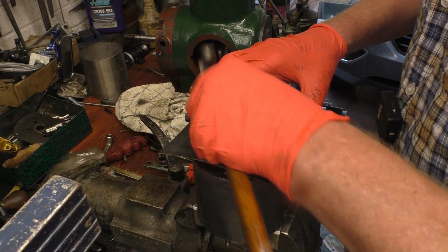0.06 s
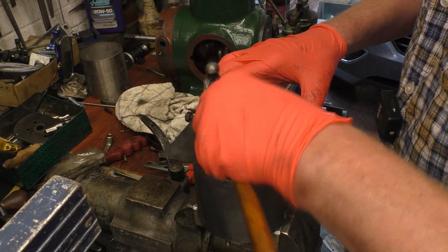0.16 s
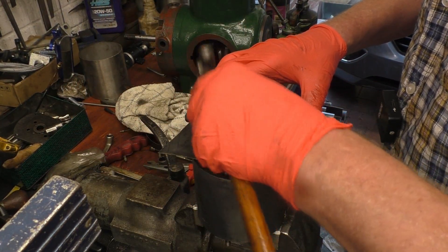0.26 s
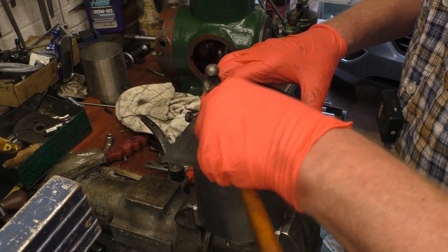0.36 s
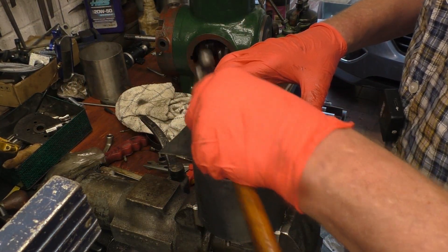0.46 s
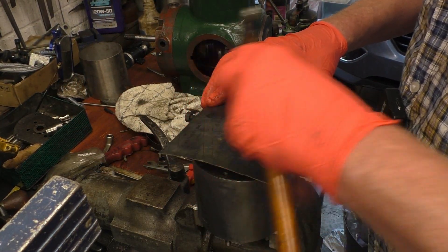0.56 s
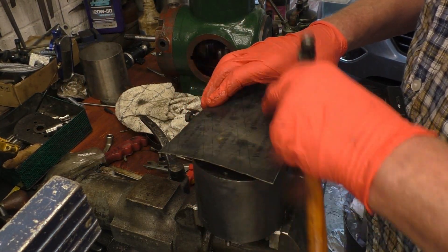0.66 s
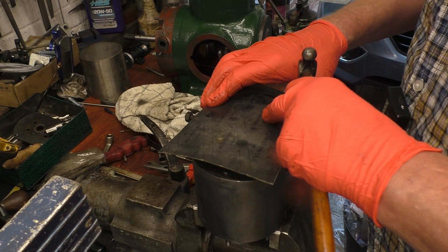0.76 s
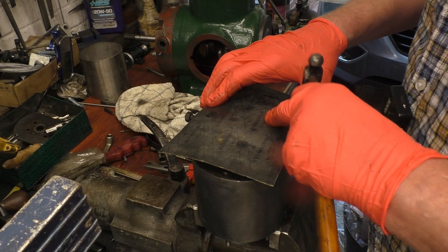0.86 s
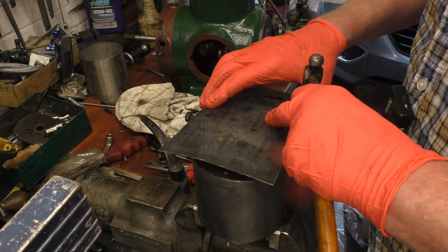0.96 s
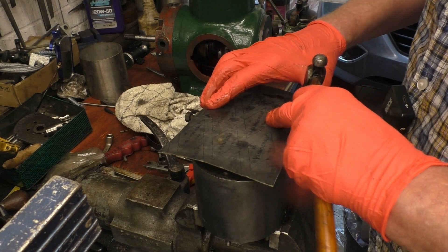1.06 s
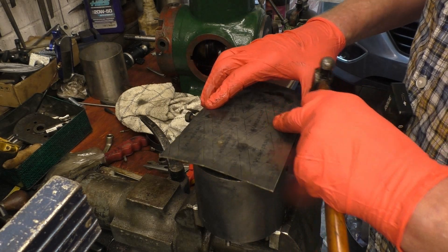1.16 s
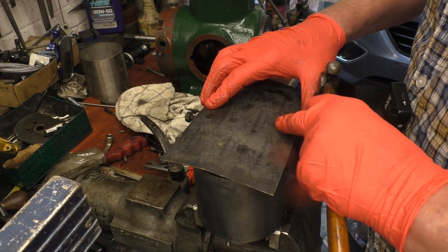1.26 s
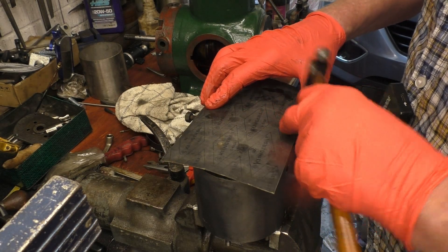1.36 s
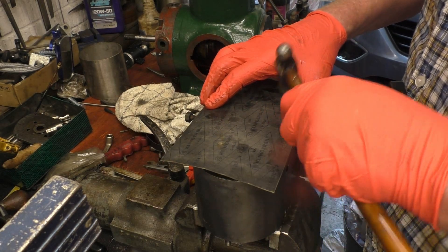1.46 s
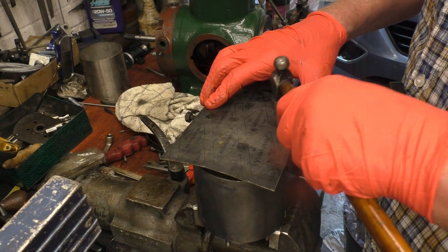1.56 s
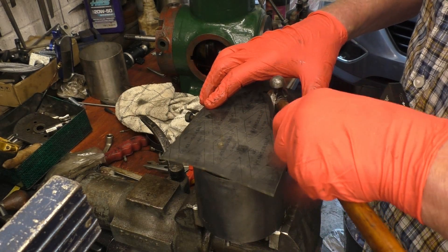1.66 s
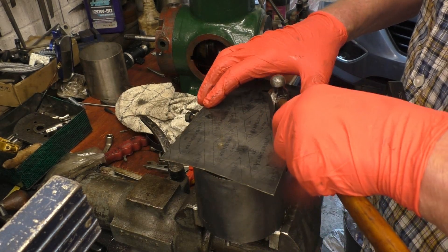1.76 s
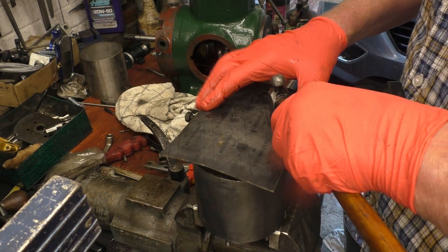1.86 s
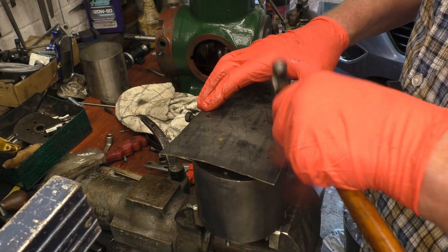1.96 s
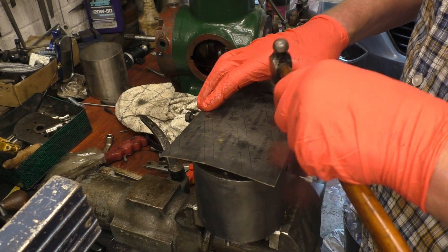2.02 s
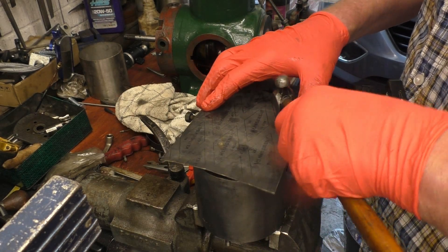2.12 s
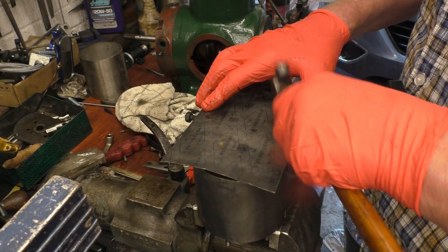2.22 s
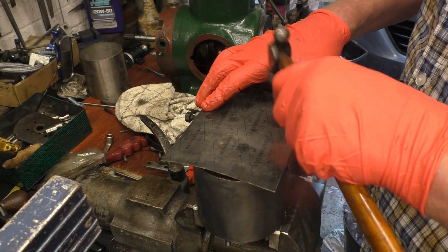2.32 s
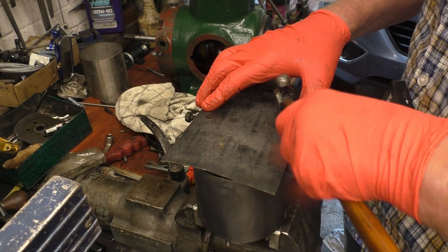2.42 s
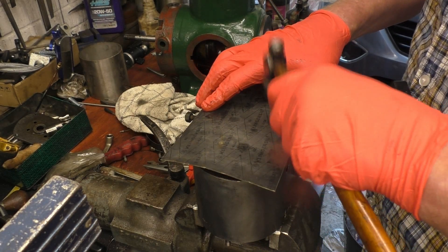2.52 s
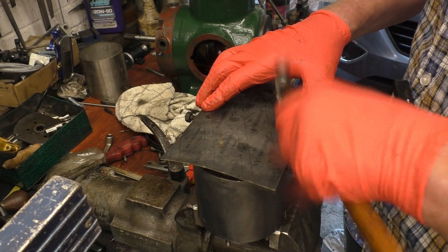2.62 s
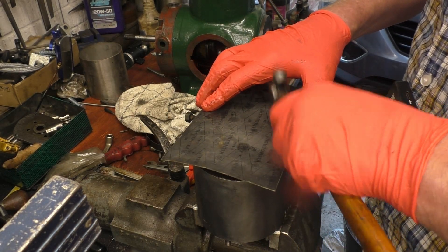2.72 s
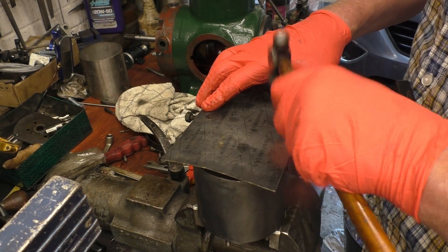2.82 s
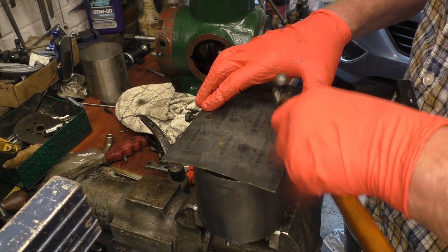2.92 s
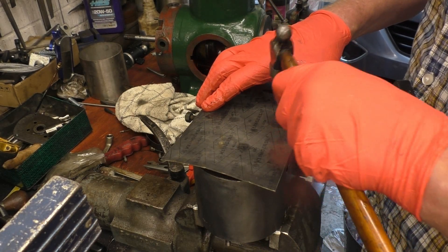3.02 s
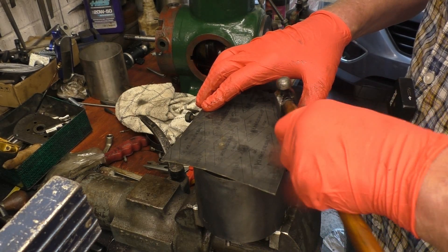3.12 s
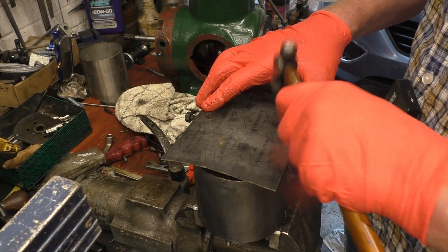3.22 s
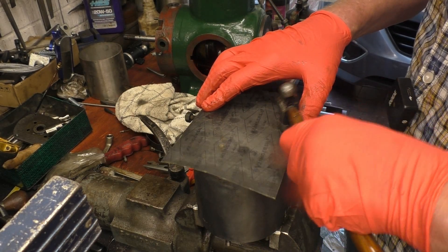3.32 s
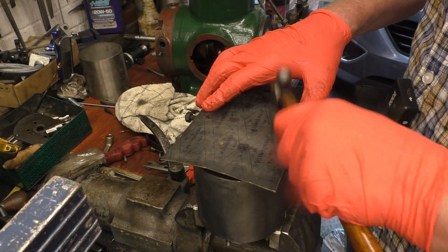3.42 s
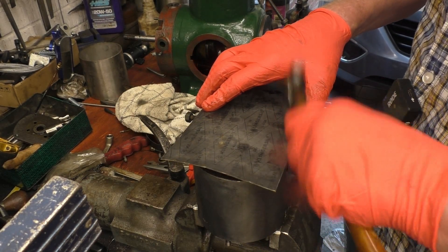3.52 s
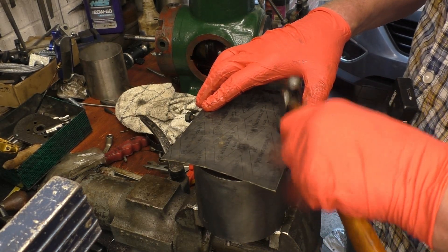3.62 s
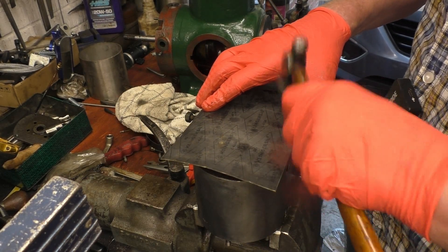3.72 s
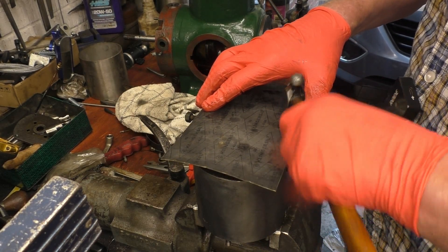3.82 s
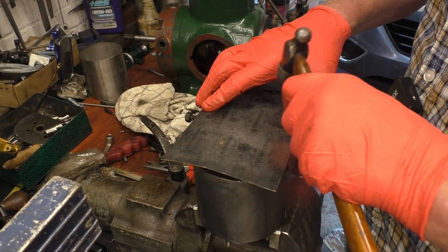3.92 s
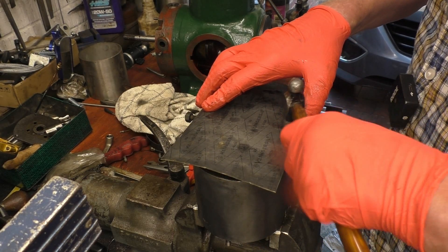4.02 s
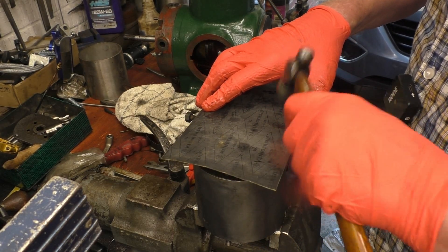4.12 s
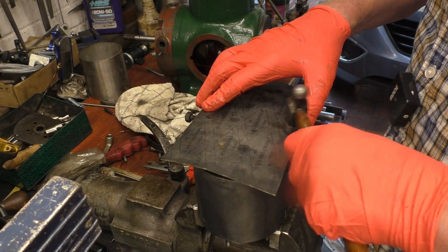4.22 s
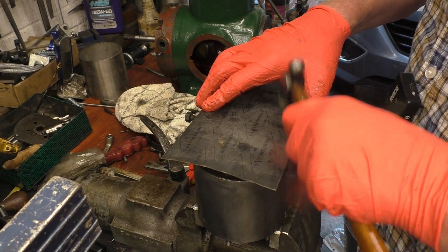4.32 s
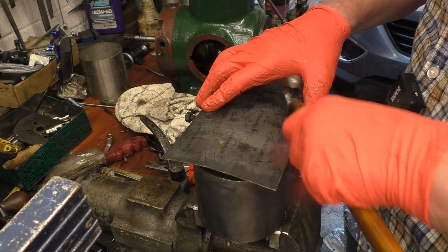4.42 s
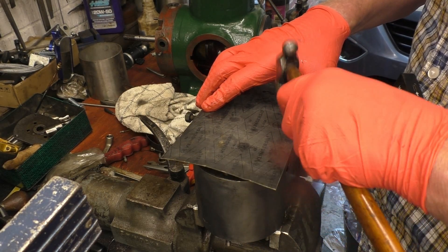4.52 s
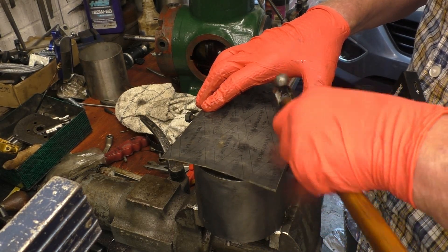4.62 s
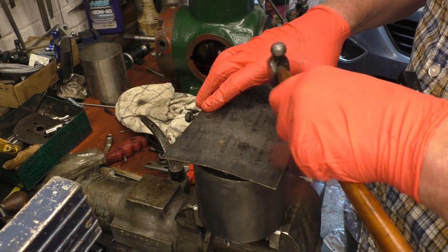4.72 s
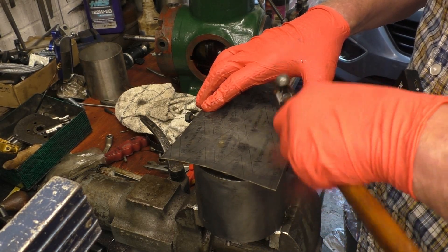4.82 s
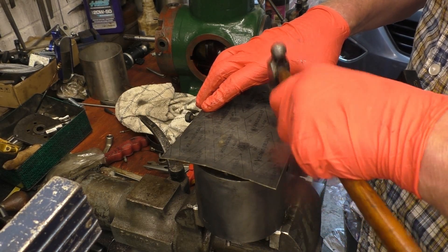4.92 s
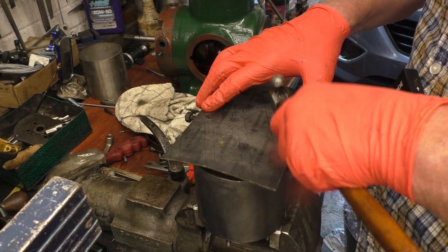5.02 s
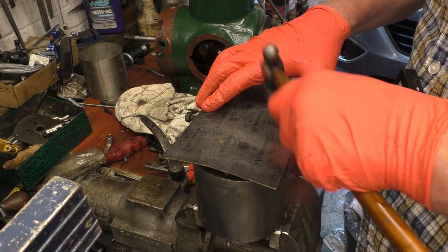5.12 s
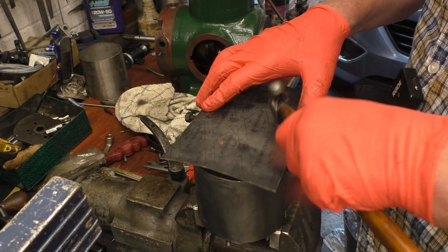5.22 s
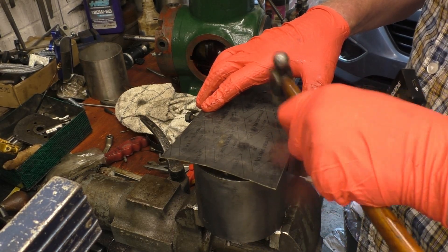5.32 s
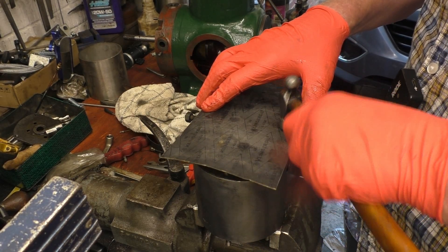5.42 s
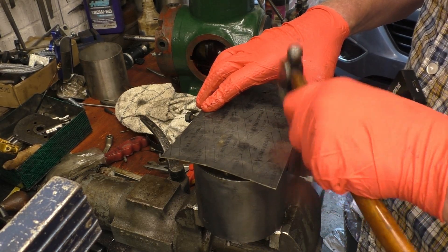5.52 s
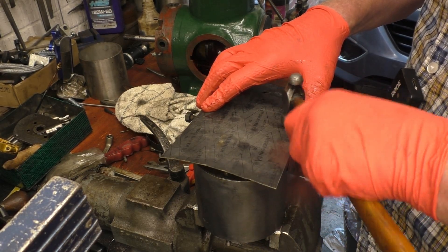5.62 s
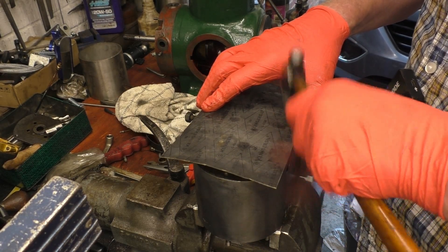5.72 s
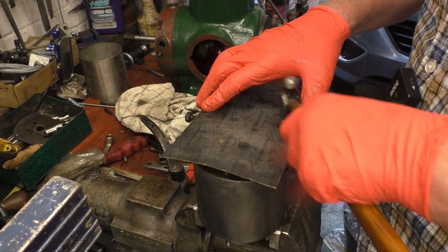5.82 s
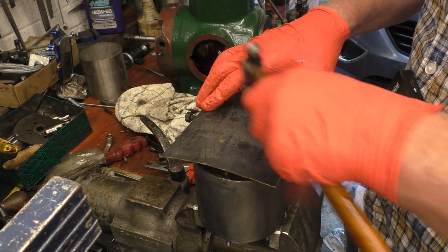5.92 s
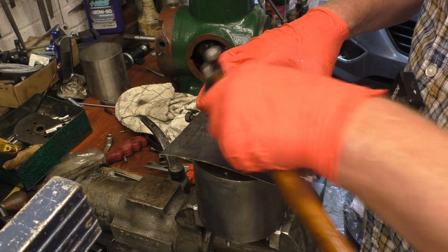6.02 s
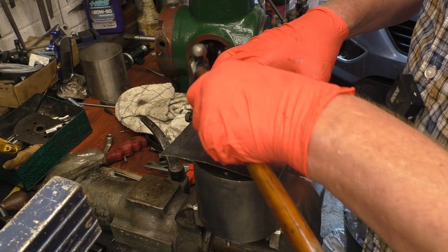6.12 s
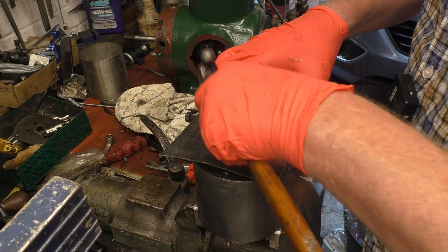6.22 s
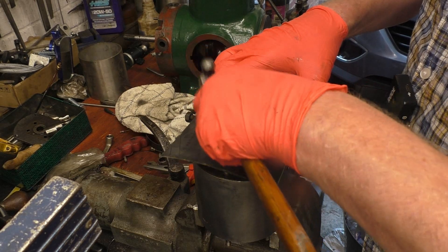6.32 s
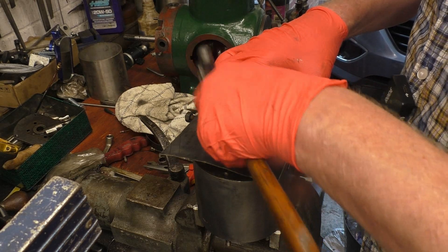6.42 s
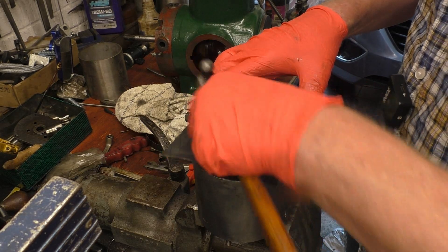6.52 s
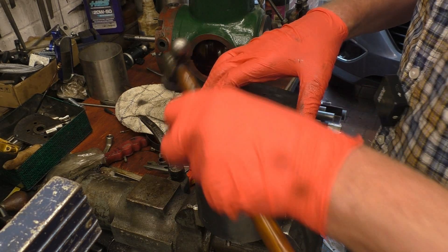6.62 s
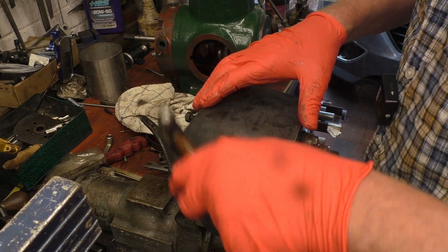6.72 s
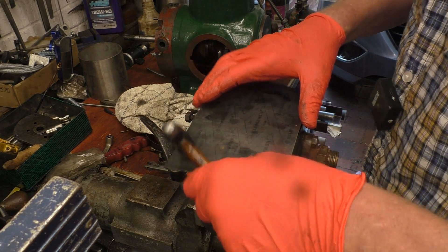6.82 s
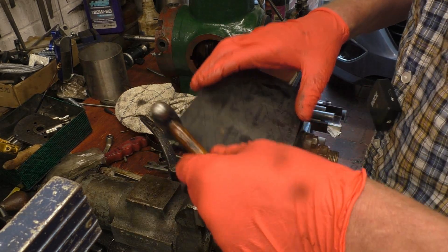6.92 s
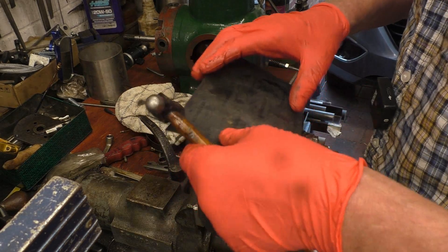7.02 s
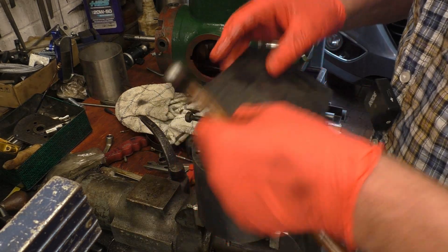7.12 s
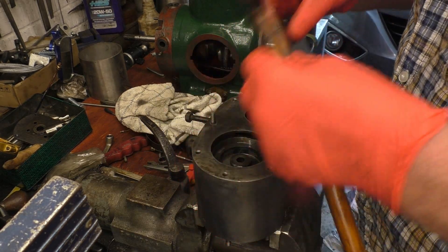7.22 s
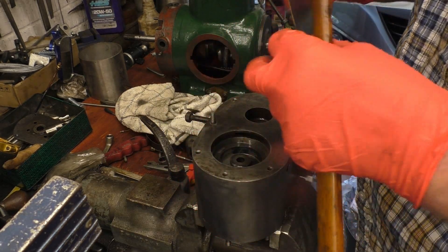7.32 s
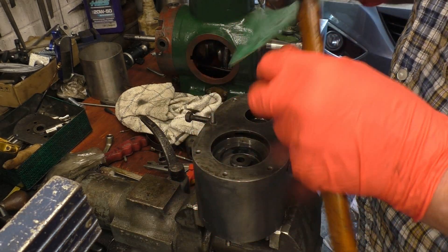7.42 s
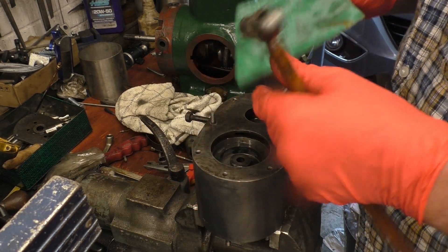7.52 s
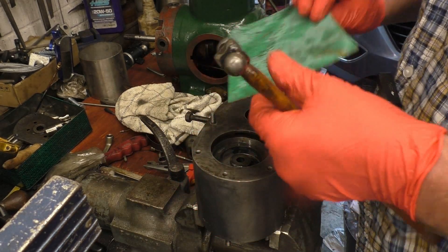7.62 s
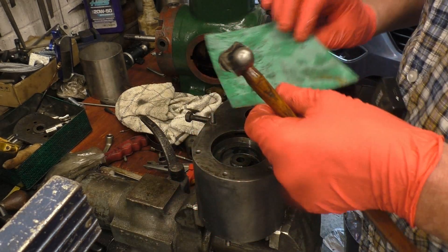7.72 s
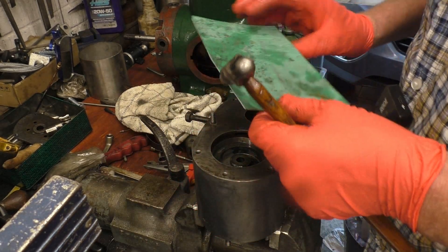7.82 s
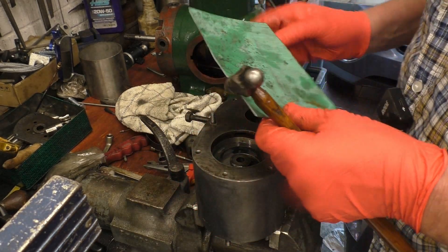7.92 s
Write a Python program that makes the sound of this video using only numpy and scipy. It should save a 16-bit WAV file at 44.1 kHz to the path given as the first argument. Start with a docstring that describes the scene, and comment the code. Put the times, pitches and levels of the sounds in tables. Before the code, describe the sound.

A close microphone in a small workshop, with faint low air noise and machine hum behind. Three hard hammer blows come at 0.05, 0.25 and 0.45 s: short, dry knocks around a mid pitch, with a bright clack, a brief metallic ring and a short room echo, slightly crushed by overload. From 0.5 to 1.6 s the paper slides with soft hisses, and there is a light bump near 0.8. A barely audible tap at 1.7 and a soft one at 2.2 lead into a regular run, four to five blows a second, until 5.85 s, varying in force and papery snap, some slightly softer near 5. After a gap come a weak tap at 6.35 and a firmer one at 6.55. Light bumps follow at 6.8 to 6.9, then until about 8 s gloves rub dully, the stiff sheet rustles and ticks, and the part is nudged with low knocks, strongest near 7.47.

```python
"""A small hammer taps out a gasket, close to the microphone in a small workshop: thick paper over a metal part.
Each blow adds decaying noise (thud, clack, snap) to ringing tones of part and room; strong peaks overload the input.
Filtered frictional noise gives the hiss of the sliding sheet and the dull rub of the gloves that lift it off.
Short filtered bursts make the bumps, nudges and paper ticks; steady noise and four drifting tones lie behind."""
import sys
import numpy as np
from scipy import signal
from scipy.fft import rfft, irfft, next_fast_len
from scipy.io import wavfile

SR = 44100
rng = np.random.default_rng(int(sys.argv[2]) if len(sys.argv) > 2 else 0)


def wav_out(sig):
    """Save sig, one row per channel (or a flat mono array), as 16-bit PCM at SR to the path in sys.argv[1]."""
    wavfile.write(sys.argv[1], SR, np.round(np.clip(np.atleast_2d(sig).T, -1, 1) * 32767).astype(np.int16))


N = 350947  # length in samples
T = np.arange(SR // 2) / SR  # seconds within each short sound


def amp(db):
    """Decibels to gain."""
    return 10 ** (np.asarray(db) / 20)


def unit(x):
    """Scale to rms 1."""
    return x / np.sqrt(np.mean(x ** 2) + 1e-20)


def along(points, hz):
    """Read (Hz, value) points on a logarithmic frequency axis."""
    point_hz, values = np.transpose(points)
    return np.interp(np.log(hz + 1), np.log(point_hz + 1), values)


def add(track, start_s, sound):
    """Mix a sound into the track from start_s on."""
    place = track[round(start_s * SR):][:len(sound)]
    place += sound[:len(place)]


def coloured(x, spectrum):
    """Filter x with a causal, minimum-phase response of the given (Hz, dB) spectrum, at rms 1."""
    m = 2 * next_fast_len(len(x))
    log_gain = np.log(amp(along(spectrum, np.fft.rfftfreq(m, 1 / SR))))
    cepstrum = irfft(log_gain)
    # folding the cepstrum onto positive time makes the filter causal
    cepstrum[1:m // 2] *= 2
    cepstrum[m // 2 + 1:] = 0
    response = np.exp(rfft(cepstrum))
    return unit(irfft(rfft(x, m) * response)[:len(x)])


def burst(t60):
    """White noise that dies away by 60 dB in t60 seconds."""
    return rng.standard_normal(len(T)) * amp(-60 * T / t60)


# The small workshop around the microphone. Each row: frequency in Hz, time to die by 60 dB in seconds.
ROOM_DECAY = [(40, 0.7), (100, .35), (170, 0.31), (300, 0.23), (900, 0.22), (2500, 0.26), (5000, 0.24),
              (14000, 0.13)]


def room_tail():
    """A diffuse echo in which each frequency dies at its own speed, at rms 1."""
    hz, t, cells = signal.stft(rng.standard_normal(len(T)), SR, nperseg=256)
    decay = amp(-60 * t / along(ROOM_DECAY, hz)[:, None])
    tail = signal.istft(cells * decay, SR, nperseg=256)[1][:len(T)]
    tail = tail * (1 - np.exp(-(T / 0.0021) ** 2))  # the walls take a few ms to answer
    return unit(tail)


def with_echo(t60):
    """A noise burst and its room echo, each at rms 1."""
    return np.array([unit(burst(t60)), unit(room_tail())])


def heard(pair, spectrum, wet_db):
    """A burst and its echo in the colour of what was struck, at rms 1."""
    direct, echo = pair
    return coloured(direct + amp(wet_db) * echo, spectrum)


def wander(t, rate_hz):
    """Random values, rate_hz of them a second, joined by straight lines."""
    count = int(t[-1] * rate_hz) + 2
    return np.interp(t * rate_hz, np.arange(count), rng.standard_normal(count))


def friction(size, grain=0.37, sway=0.16, crackles_per_s=30, crackle_size=10):
    """Stick and slip: noise whose strength varies finely and in slower lumps, with sparse crackles."""
    t = np.arange(size) / SR
    # fibres that catch and let go
    caught = rng.random(size) < crackles_per_s / SR
    crackles = crackle_size * caught * rng.laplace(size=size)
    strength = np.exp(grain * wander(t, 500) + sway * wander(t, 40))
    return (rng.standard_normal(size) + crackles) * strength


# The air of the workshop, steady behind everything. Each row: frequency in Hz, spectrum level in dB.
AIR_SPECTRUM = [(12, -42), (20, 0.5), (55, -17.5), (228, -6.5), (328, -10), (434, -9), (678, -14.5),
                (738, -6), (897, -14.5), (1060, -12.5), (1440, -16.5), (1660, -20), (3950, -25.5),
                (6010, -26.5), (16000, -37.5)]
# The faint machine hum. Each row: frequency in Hz, rms level in dB before the common hum lift.
HUM_TONES = [(96.9, -74), (393.0, -72), (527.6, -77), (748.3, -76)]


def workshop(air_db=-58, hum_lift_db=1.5):
    """Steady coloured air noise and machine tones whose phases drift at random."""
    t = np.arange(N) / SR
    hum = np.zeros(N)
    for hz, db in HUM_TONES:
        drift = np.cumsum(rng.standard_normal(N)) * 0.018  # radians
        hum += amp(db) * np.sqrt(2) * np.sin(2 * np.pi * hz * t + drift)
    air = coloured(rng.standard_normal(N), AIR_SPECTRUM)
    return amp(air_db) * air + amp(hum_lift_db) * hum


# Gloves take hold of the sheet and lift it off. Each row: time in seconds, level in dB before the rub lift.
GLOVE_GRIP = [(6.68, -58.5), (7.142, -51.5), (7.4, -48), (7.532, -50.5), (7.67, -64), (7.95, -54.5)]
# The dull rub of the gloves, close by. Each row: frequency in Hz, spectrum level in dB.
GLOVE_SPECTRUM = [(18, -24), (30, -10), (76, -5), (295, -7.5), (339, -4.5), (638, -6.5), (802, -7.5),
                  (2000, -11.5), (2600, -12.5), (4400, -120)]


def gloves(rub_lift_db=1, fade_s=0.027):
    """The gloves rub on the sheet: dull frictional noise that follows the strength of the grip."""
    t = np.arange(N) / SR
    grip_s, grip_db = np.transpose(GLOVE_GRIP)
    fade_in = np.clip(1 + (t - grip_s[0]) / fade_s, 0, 1)
    level = amp(np.interp(t, grip_s, grip_db) + rub_lift_db)
    return fade_in * level * coloured(friction(size=N), GLOVE_SPECTRUM)


# The sheet slides on metal and glove.
# Each row: start in seconds, length in seconds, level in dB before the swell, centre of the hiss in Hz.
SHEET_SLIDES = [(0.499, 0.27, -56.5, 5200), (0.759, 0.049, -48, 4900), (0.815, 0.073, -56.5, 7000),
                (0.85, 0.32, -63.5, 5500), (1.159, 0.17, -57, 8000), (1.389, 0.066, -61.5, 2950),
                (1.455, 0.14, -51, 4340), (1.751, 0.35, -63.5, 4540), (6.329, 0.09, -54, 6500),
                (6.55, 0.3, -57.5, 5820), (6.8, 0.4, -55, 4500), (7.097, 0.12, -49.5, 7050),
                (7.161, 0.18, -51.5, 6500), (7.26, 0.37, -48.5, 2270), (7.573, 0.17, -57, 3240),
                (7.785, 0.23, -50.5, 5260)]
# Paper rustle before the peak of each slide. Each row: frequency in Hz, spectrum level in dB.
RUSTLE_SPECTRUM = [(700, -32), (1300, 0), (2000, -3.5), (2800, -4), (4300, -5.5), (6400, -4.5),
                   (7600, -5.5), (9000, -8), (12000, -16), (16000, -27)]


def sheet(peak_db=9, peak_octaves=1, swell_exponent=0.96):
    """Each slide of the paper is a finely grained hiss that swells and fades in an arch."""
    out = np.zeros(N)
    hz = np.geomspace(300, 16000, 60)
    for start_s, length_s, db, centre_hz in SHEET_SLIDES:
        peak = peak_db * np.exp(-(np.log2(hz / centre_hz) / peak_octaves) ** 2)
        colour = along(RUSTLE_SPECTRUM, hz) + peak
        swell = np.abs(np.sin(np.pi * np.minimum(T / length_s, 1))) ** swell_exponent
        hiss = coloured(friction(size=len(T)), np.column_stack([hz, colour]))
        add(out, start_s, amp(db) * swell * hiss)
    return out


def small_knock(hz, thump_db=-10):
    """A small knock around one pitch, with a soft thump through the bench."""
    colour = [(hz / 4, -12), (hz * .7, -7), (hz, 0), (hz * 1.5, -9), (hz * 5, -34), (16000, -55)]
    knock = heard(with_echo(t60=0.031), colour, wet_db=-9)
    thump = coloured(burst(t60=0.091), [(25, -23), (90, 5), (200, 2.0), (500, -41.0)])
    return knock + amp(thump_db) * thump


def tick(hz, treble_db):
    """A very short burst around one pitch, with its echo."""
    colour = [(hz * .6, -22), (hz * .88, -7), (hz, 4), (hz * 1.15, -6), (hz * 1.8, -16), (16000, treble_db)]
    return heard(with_echo(t60=0.0087), colour, wet_db=-14.5)


# The stiff sheet ticks as it bends. Each row: start in seconds, level in dB, pitch in Hz.
SHEET_TICKS = [(1.42, -72, 2200), (2.03, -74, 2290), (6.7195, -61, 2170), (7.163, -61.5, 3140),
               (7.2442, -62, 1600), (7.327, -67, 1520), (7.3588, -59, 1850), (7.47, -58.5, 1450),
               (7.7705, -72, 2960), (7.8974, -55.5, 2190)]


def sheet_ticks():
    """The bending sheet gives short pitched ticks."""
    out = np.zeros(N)
    for start_s, db, hz in SHEET_TICKS:
        add(out, start_s, amp(db) * tick(hz, treble_db=-48))
    return out


# A hand nudges the part on the bench. Each row: start in seconds, level in dB of the knock, pitch in Hz.
HAND_NUDGES = [(7.035, -57.5, 282), (7.194, -66, 420), (7.358, -66, 400), (7.461, -54.5, 640),
               (7.472, -49.5, 405), (7.541, -66, 200), (7.6457, -60.5, 150)]


def nudges():
    """Each nudge is a dull knock of the part with a thump of the bench."""
    out = np.zeros(N)
    for start_s, db, hz in HAND_NUDGES:
        add(out, start_s, amp(db) * small_knock(hz))
    return out


# The hammer head or the sheet drops lightly on the part. Each row: start in seconds, level in dB of the knock.
LIGHT_BUMPS = [(0.783, -52), (6.815, -45.5), (6.8704, -55.5), (6.9235, -67)]


def bumps(knock_hz=1030, tick_hz=1480, tick_db=-2):
    """A light drop on the part: a bright knock and a tick together."""
    out = np.zeros(N)
    for start_s, db in LIGHT_BUMPS:
        bump = small_knock(knock_hz) + amp(tick_db) * tick(tick_hz, treble_db=-33)
        add(out, start_s, amp(db) * bump)
    return out


# Ringing tones after each blow: the lowest four hum in the workshop, the others ring in the metal part.
# Each row: tone in Hz, level in dB before favour and scatter, time to die by 60 dB in seconds.
RINGING_TONES = [(167.7, -34, 0.62), (211.7, -20, 0.17), (267, -19.5, 0.16), (462, -11, 0.19),
                 (558, -7.5, 0.074), (669.7, 8.5, 0.024), (729, -6, 0.036), (818, 4, 0.043),
                 (1159.4, -1.5, 0.065), (1359.5, 1, 0.04)]


def ringing(centre_hz, scatter_db=2.0, favour_db=9, width_hz=95):
    """Decaying sines, as (Hz, wave): the struck spot favours tones near one pitch, and each level scatters."""
    tones = []
    for hz, db, t60 in RINGING_TONES:
        favour = favour_db * np.exp(-((hz - centre_hz) / width_hz) ** 2)
        level_db = db + favour + scatter_db * rng.normal()
        tones.append((hz, amp(level_db - 60 * T / t60) * np.sin(2 * np.pi * hz * T)))
    return tones


def contact():
    """Noise for a contact on the rim: its thud, clack and snap, each with its echo."""
    return np.array([with_echo(t60=0.029), with_echo(t60=0.04), with_echo(t60=0.0088)])


def softened(spectrum, edge_hz):
    """A softer contact loses what lies above its edge, where it is 3 dB down."""
    return [(hz, db - 10 * np.log10(1 + (hz / edge_hz) ** 8)) for hz, db in spectrum]


KNOCK_DB, CLACK_DB, BENCH_DB = -16, -22.5, -49  # base levels in a blow of force 0 dB


def blow_levels(force_db, press_db=-12.5, press_slope=1.7):
    """The clack follows the force; the knock levels off once the paper is pressed flat on the metal."""
    # under press_db the paper cushions the knock, by press_slope dB per dB
    cushioned_db = 20 * np.log10(1 + amp(2 * press_slope * (press_db - force_db))) / 2
    return KNOCK_DB - cushioned_db, CLACK_DB + force_db


# The hammer blows, close to the microphone. Each row: start in seconds, force in dB,
# ring of the metal in dB, snap of the paper in dB before the snap lift, top edge of the clack in Hz.
HAMMER_BLOWS = [(0.056, 0.5, -27, -40, 3720), (0.254, 1, -27, -39.5, 3920), (0.441, 4, -26, -44, 4440),
                (1.717, -23.5, -39.5, -58.5, 4900), (2.1906, -12.5, -35.5, -43, 4170),
                (2.4763, -5.5, -29.5, -38, 3970), (2.7261, -3.5, -29, -36, 3900),
                (2.9557, -3.5, -25, -36, 3860), (3.1839, 0, -28.5, -43.5, 4500),
                (3.3945, -2.5, -27.5, -37.5, 4320), (3.6305, -1, -28.5, -44.5, 4470),
                (3.8511, -0.5, -28, -52, 3840), (4.0786, 0.5, -27, -72, 3940),
                (4.2933, -4.5, -30, -46, 3400), (4.4909, -3.5, -31, -51, 4000),
                (4.6748, -3.5, -27, -37, 3160), (4.8598, -7.5, -30.5, -43.5, 3660),
                (5.0521, -5.5, -26, -42, 4050), (5.2606, -11.5, -32, -49, 4340),
                (5.4541, -5.5, -30, -40.5, 4000), (5.6507, -2, -25.5, -61, 3800),
                (5.8433, -1, -28.5, -52.5, 4030), (6.352, -16, -35.5, -59.5, 2800),
                (6.5346, -5.5, -28, -47, 3100)]
# Pitch favoured as the hammer travels round the rim. Each row: time in seconds, pitch in Hz.
RIM_PITCH = [(0.4, 734), (2.2, 740), (3.3, 805), (4.5, 747), (6.5, 700)]
# The layers of a blow: dull thud, bright clack, metal ring, sharp snap, then the bench under the part.
# Each row: frequency in Hz, spectrum level in dB.
THUD_SPECTRUM = [(20, -22.5), (110, -16), (200, -6), (330, 0), (480, 3), (750, 7), (950, 2), (1300, -8.5),
                 (2200, -38.5)]
CLACK_SPECTRUM = [(900, -25.5), (1500, -6.5), (1780, -6.5), (2000, -0.5), (2230, -4.5), (2850, -2),
                  (3150, -6.5), (3600, -10.5), (3950, -4.5), (4500, -12), (6000, -11), (12000, 1)]
RING_SPECTRUM = [(700, -21), (1000, -8), (1140, 5.5), (1250, 4), (1370, 3.5), (1600, -10), (2200, -40)]
SNAP_SPECTRUM = [(2500, -31), (4500, 6.5), (6700, 7.5), (8500, 3.5), (12000, -11), (16000, -21.5)]
BENCH_SPECTRUM = [(20, -4), (45, -8), (90, -3.5), (130, 2), (250, -8), (380, -7.5), (700, -39.5)]


def hammer(change=0.85, lead_s=0.00054, give_s=0.0025, bench_follow=0.51, snap_lift_db=2.0,
           ring_from_hz=1000, right_from_s=1, right_to_s=6):
    """Each blow mixes the shared noise of its side of the rim with nearly as much fresh noise."""
    out = np.zeros(N)
    sides = [contact(), contact()]
    cushion = 1 - np.exp(-(T / give_s) ** 2)  # the paper gives way before the metal takes the blow
    for start_s, force_db, ring_db, snap_db, edge_hz in HAMMER_BLOWS:
        knock_db, clack_db = blow_levels(force_db)
        # the hammer works the right side of the rim between these two times
        side = int(right_from_s < start_s < right_to_s)
        thud, clack, snap = sides[side] + change * contact()

        tones = ringing(np.interp(start_s, *np.transpose(RIM_PITCH)))
        low_tones = unit(sum(wave for hz, wave in tones if hz < ring_from_hz))
        high_tones = unit(sum(wave for hz, wave in tones if hz >= ring_from_hz))
        knock = low_tones + amp(-8.5) * heard(thud, THUD_SPECTRUM, wet_db=-8.5)
        ring = high_tones + amp(-4) * heard(snap, RING_SPECTRUM, wet_db=-6)

        blow = amp(knock_db) * cushion * knock
        blow += amp(ring_db) * ring
        blow += amp(clack_db) * heard(clack, softened(CLACK_SPECTRUM, edge_hz), wet_db=-10.5)
        blow += amp(snap_db + snap_lift_db) * heard(snap, SNAP_SPECTRUM, wet_db=-17.0)
        # the weight of the head thumps the bench, its level following only part of the knock's change
        bench_db = BENCH_DB + bench_follow * (knock_db - KNOCK_DB)
        blow += amp(bench_db) * cushion * coloured(burst(t60=0.4), BENCH_SPECTRUM)

        # a light blow barely shakes the sheet, so more of its sound lies in the first milliseconds
        lightness_db = np.clip(0.3 * (-2.0 - force_db), 0, 5)
        add(out, start_s, blow * amp(lightness_db * np.exp(-T / 0.0033)))

        # the head first touches the sheet, just before it presses it onto the metal
        touch = coloured(burst(t60=.025), [(200, 2.5), (2000, 1), (14000, -15.5)])
        add(out, start_s - lead_s, amp(-56.0) * touch)
    return out


def scene():
    """Everything as it reaches the one microphone."""
    background = workshop()
    handling = gloves() + sheet() + sheet_ticks() + nudges() + bumps()
    return (background + handling + hammer())[None]


def record(dry, ceiling=0.52, hardness=5, top_hz=16000):
    """The microphone input rounds off peaks towards its ceiling, and its band ends steeply at top_hz."""
    clipped = dry / (1 + np.abs(dry / ceiling) ** hardness) ** (1 / hardness)
    m = next_fast_len(N + SR // 2)
    band = 1 / (1 + (np.fft.rfftfreq(m, 1 / SR) / top_hz) ** 90)
    return irfft(rfft(clipped, m) * band, m)[..., :N]


dry = scene()
out = record(dry)
wav_out(out)
```